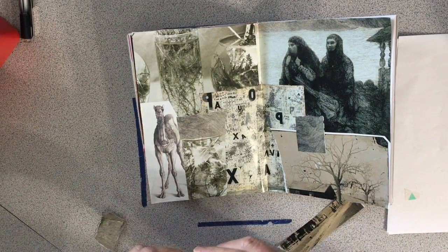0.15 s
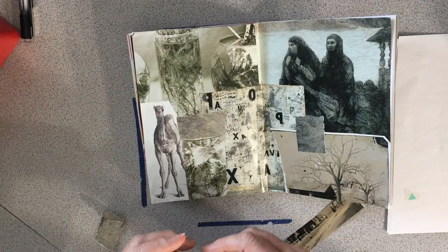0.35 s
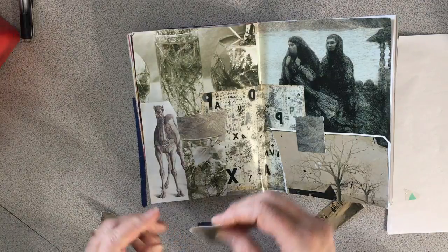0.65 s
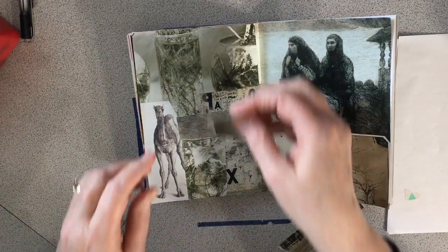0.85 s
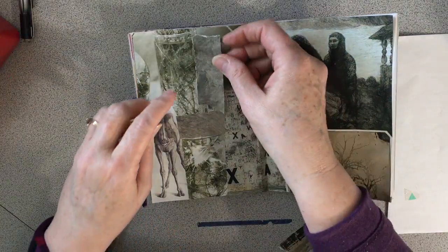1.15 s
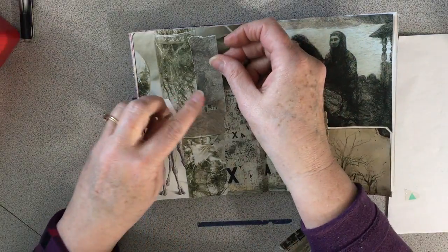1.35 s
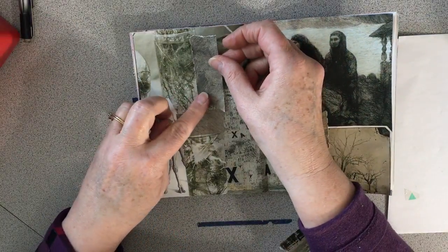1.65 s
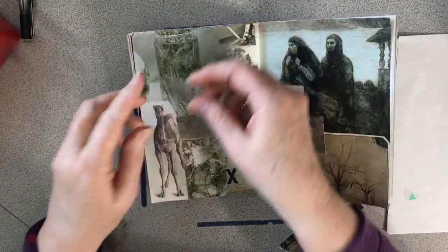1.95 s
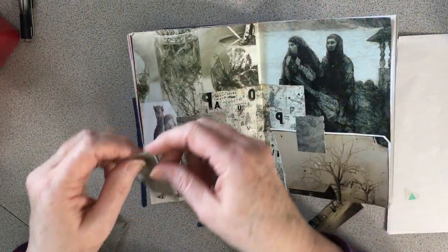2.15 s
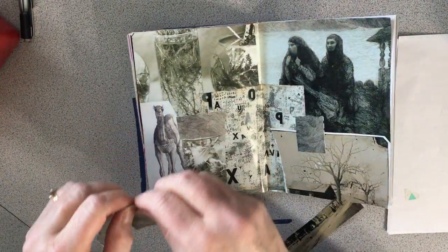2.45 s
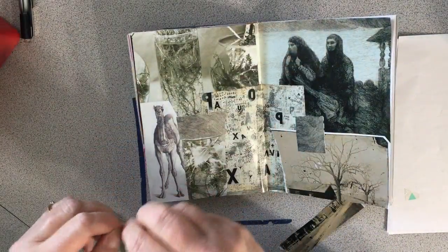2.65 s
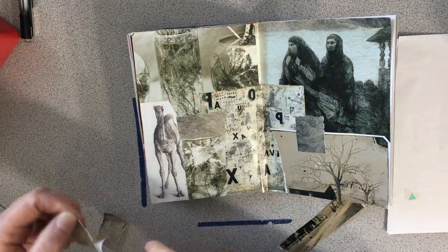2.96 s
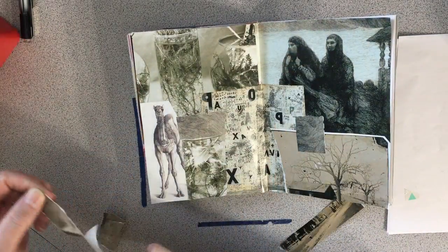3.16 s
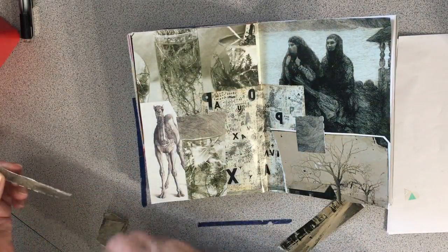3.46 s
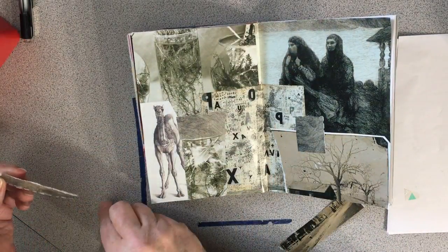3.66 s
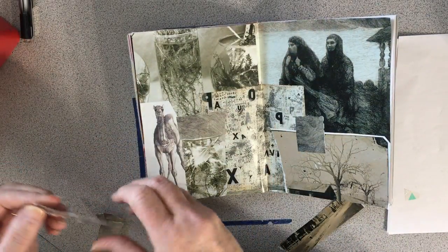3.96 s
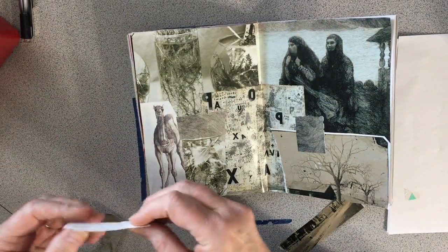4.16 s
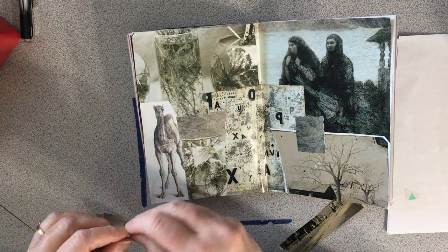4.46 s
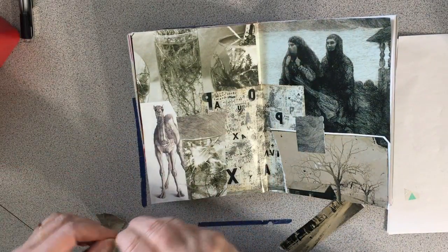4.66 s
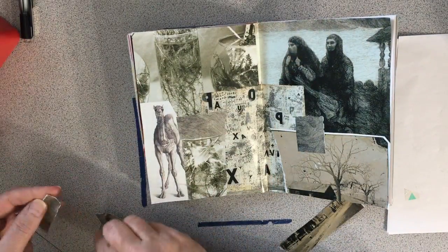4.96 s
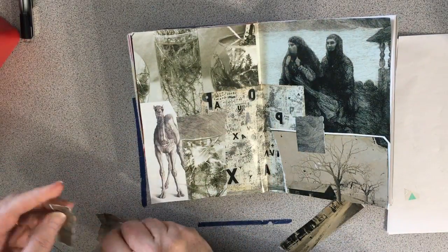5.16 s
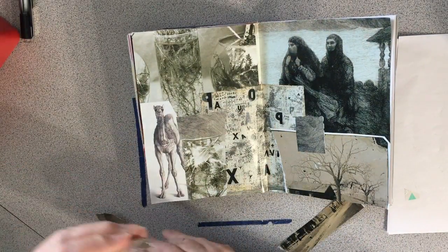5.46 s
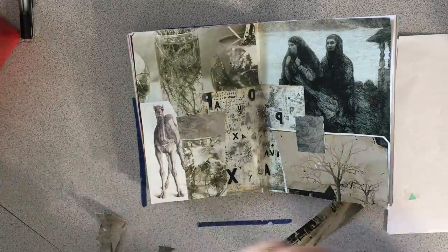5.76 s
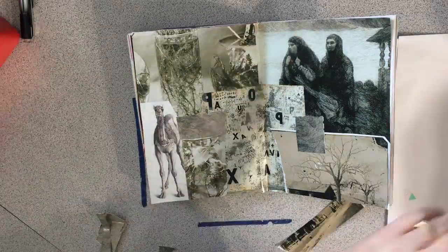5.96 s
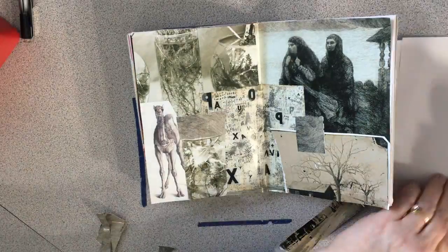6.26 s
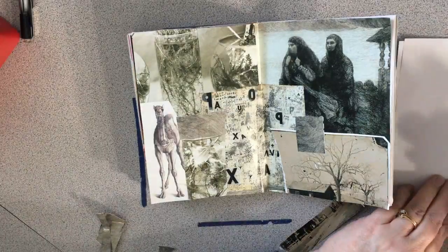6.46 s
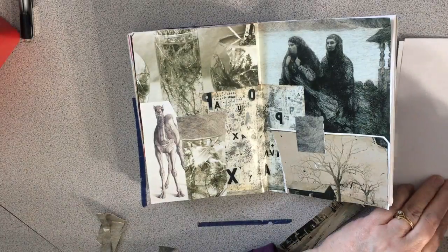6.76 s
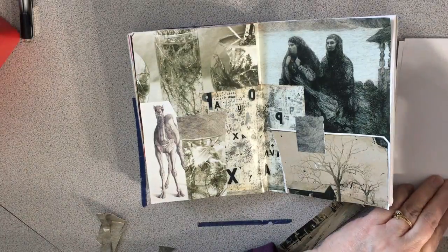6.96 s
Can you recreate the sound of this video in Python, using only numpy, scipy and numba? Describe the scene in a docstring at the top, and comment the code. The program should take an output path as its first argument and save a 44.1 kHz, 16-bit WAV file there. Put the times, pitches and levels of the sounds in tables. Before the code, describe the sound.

Close paper handling at a desk: faint crackles, a sharp dry rip, a very short snip of a tear, then a hand softly thumping the tabletop.

```python
"""Paper collage at a desk in a quiet room, heard close: ventilation rumble and hiss (shaped noise) throughout.
From the start a scrap is picked up and tried on the page: brushes and strokes (noise, grain), ticks (bursts).
Near 2.9 s a long rip, near 4.8 s a very short one: snapping fibres drive a flap whose ring falls as it grows,
while bending paper sings in gliding modes. From 6 s a hand slides a sheet and knocks softly on the desk,
heard as decaying modes of its top; the hardest knock leaves thin metal ringing."""
import sys
import numpy as np
from scipy import signal
from scipy.fft import rfft, irfft, next_fast_len
from scipy.io import wavfile
from scipy.ndimage import uniform_filter1d, map_coordinates
from numba import njit

SR = 44100
rng = np.random.default_rng(int(sys.argv[2]) if len(sys.argv) > 2 else 0)


def master(y):
    """Save y as 16-bit WAV."""
    cut = np.clip(np.atleast_2d(y).T, -1, 1)
    pcm = np.round(cut * 32767)  # scale
    wavfile.write(sys.argv[1], SR, pcm.astype(np.int16))


N = 313110

# Ventilation rumble: pitch_hz, density_db (per Hz)
VENT_SPECTRUM = [(13, -58), (22, -30.5), (36, -1.5), (54, 0.5), (68, -11), (86, -11), (119, -8), (131, -15),
                 (146, -18.5), (221, -18.5), (249, -19), (278, -24.5), (333, -27), (400, -33.5), (520, -44),
                 (880, -120)]
# Narrow bands of the ventilation: pitch_hz, width_hz, level_db
VENT_BANDS = [(58.6, 24, -61.5), (255.8, 9.6, -78.5), (2940, 150, -117)]
# Even hiss of the place: pitch_hz, density_db (per Hz)
AIR_SPECTRUM = [(180, -26), (300, 4), (344, 4.5), (544, 1), (938, -1), (1130, -4), (1980, -4.5), (2830, -7),
                (3660, -6), (12000, -23), (17500, -32)]
# Thin whines in the room: pitch_hz, level_db
WHINES = [(2040, -86), (2796, -84)]
WHINE_WAVER_DB = 0.5

# A hand or sleeve brushes over the desk: middle_s, length_s, level_db, pitch_hz
BRUSHES = [(0.2, 0.56, -75.5, 1610), (0.8, 0.57, -76, 1740), (1.635, 0.38, -73, 1550),
           (2.168, 0.68, -70.5, 1410), (3.967, 0.06, -72.5, 4100), (4.12, 0.13, -77, 1420),
           (5.062, 0.07, -76, 3960), (5.317, 0.069, -73, 4370), (5.774, 0.28, -75, 1390),
           (6.45, 0.4, -77, 3700), (6.597, 0.66, -74, 1880)]
BRUSH_WIDTH = 0.37  # width of the hush over its centre
BRUSH_OVERTONE, BRUSH_OVERTONE_DB = 2.08, -11.5  # upper band: ratio, level before its doubled width

# Fingers and paper stroking paper: middle_s, length_s, level_db (relative), tilt_db (per octave)
STROKES = [(0.136, 0.17, -62, 4.5), (0.367, 0.31, -67, -1.5), (0.432, 0.03, -47, 0),
           (0.828, 0.042, -65.5, -4), (0.96, 0.03, -68, 2), (1.01, 0.33, -70, -6), (1.16, 0.083, -63, -3.5),
           (1.218, 0.1, -62, -3.5), (1.326, 0.29, -72.5, -5), (2.004, 0.44, -64.5, -5),
           (2.339, 0.11, -62.5, -3), (2.455, 0.28, -67.5, -4), (2.843, 0.17, -53.5, 1.5),
           (3.476, 0.06, -74, 5), (3.68, 0.22, -68, 7.5), (3.83, 0.091, -65, 11), (4.22, 0.32, -72.5, -5),
           (4.536, 0.033, -59, 1), (4.575, 0.18, -67.5, 1.5), (4.659, 0.043, -64, -3),
           (4.699, 0.041, -60, 2.5), (4.805, 0.13, -60, 2.5), (5.004, 0.15, -66, 6),
           (5.18, 0.3, -68.5, 1.5), (5.342, 0.15, -67, 3), (5.48, 0.089, -55.5, 7), (5.702, 0.14, -63, 2),
           (5.886, 0.14, -71, -3.5), (6.237, 0.049, -48, 2.5), (6.272, 0.029, -44, 1),
           (6.368, 0.28, -64, -2.5), (6.662, 0.042, -64.5, -2), (6.747, 0.019, -61.5, 4)]
# Rubbed paper grain: pitch_hz, density_db (per Hz)
RUB_SPECTRUM = [(1180, -3), (2000, -2.5), (2630, -5.5), (3780, 0), (7860, 0), (9130, 3.5), (10400, -2.5),
                (16500, -3)]
GRAIN_RATE, CATCH_RATE = 5000, 150  # paper grains and tiny catches a second under a stroke
CATCH_DB = -76
RESTLESS_DB, PRESSURE_DB = 1.5, 1.6  # wavering of the faint rustle and of each stroke's pressure

# The scrap buckles or taps the page; the rows near 4.87 s are the short rip's last snaps: start_s, peak_db,
# body_db, edge_db (all relative), body_hz, snap_hz
TICKS = [(0.0199, -41, -9.5, -9, 1970, 4230), (0.175, -56.5, -13, 9, 1700, 6000),
         (0.2063, -48, -3, -3, 1310, 5430), (0.2147, -41, -8, -12, 1170, 5170),
         (0.3018, -61, 9, -13, 840, 4500), (0.3604, -60, 9, 4, 1160, 5000),
         (0.4328, -31, -18, -4, 1140, 6100), (0.8902, -51.5, -12, -1, 1800, 4200),
         (0.9099, -47.5, -7, 3, 1530, 4040), (0.915, -47.5, -5, -10, 1880, 3620),
         (0.946, -59, -12, 0, 1800, 5000), (1.0324, -56.5, -3.5, 5, 990, 4400),
         (1.131, -53.5, -11, -10, 2200, 3400), (1.2272, -50, -16, -4, 1800, 4400),
         (1.249, -55, -12, 4, 1800, 4600), (1.305, -61, -10, 7.5, 1800, 5000),
         (1.319, -58, -2.5, -8, 930, 4000), (1.352, -62, -2, -7, 700, 5000),
         (1.5673, -47.5, 0, -11, 830, 3170), (1.749, -64, 6, 4, 960, 2800), (1.845, -65, 7, 7, 1050, 2800),
         (1.9806, -31.5, -11.5, -8, 1550, 4270), (1.998, -41.5, -13, -12, 1170, 5000),
         (2.0341, -30, -10.5, 3.5, 1140, 4770), (2.208, -49, -14, 1, 1400, 4300),
         (2.2367, -29, -14, -7, 1000, 4730), (2.7042, -66, 12, -18, 890, 3620),
         (2.773, -42, -18, 4.5, 1180, 4920), (2.7778, -51, -17, 9, 1200, 4230),
         (2.827, -33.5, -33, -12, 1900, 4700), (3.681, -47, -12, -7, 2350, 6500),
         (4.1629, -38.5, -14, -22, 1640, 5540), (4.397, -41, -14, -12, 2160, 4330),
         (4.5102, -53, -6, 2, 890, 4000), (4.532, -48, -9.5, 3.5, 1440, 5440),
         (4.604, -53, -16, 2, 1800, 4740), (4.6916, -56, -25, 5, 1800, 4400),
         (4.753, -60, -23, 6, 1800, 6000), (4.761, -61, -25, 6.5, 1800, 6000),
         (4.7872, -53, -23, 7, 1800, 5500), (4.8641, -34, -16.5, -7, 765, 3000),
         (4.8735, -48, -25, -8, 1900, 4200), (4.881, -49, -23, -11, 1900, 4400),
         (5.2229, -57, -12, 6, 1800, 4400), (6.079, -54, -3.5, 9, 1310, 4440),
         (6.2226, -41, -24, 0, 1800, 5340), (6.319, -55, -16, 8.5, 1200, 5500),
         (6.4147, -54, -6, 4, 1800, 4400), (6.855, -60, -6, 2, 1800, 6200),
         (7.0301, -48, -13, 5.5, 1800, 5400)]
BUCKLE_ATTACK_S = 0.00094
BODY_SPAN, SNAP_SPAN = 1.65, 1.5  # a tick's bands reach this ratio above and below their centres
REBOUND_S, REBOUND_DB = 0.0095, -14.5  # the sheet springs back: typical delay, drop

# The two tears: start_s, length_s, last_flap_hz, first_uncut_hz, last_uncut_hz,
# uncut_db (ring of the uncut part, relative), parting_t60_s (last fibres letting go)
RIPS = [(2.872, 0.4427, 289, 2050, 3850, -27.5, 0.037), (4.819, 0.047, 2500, 11900, 15100, -18, 0.0055)]
# Strength of each pull: time_s, level_db (relative)
LONG_PULL = [(2.83, -60), (2.866, -51), (2.884, -46), (2.915, -33.5), (2.955, -36), (3.02, -39.5),
             (3.045, -39), (3.1, -37.5), (3.13, -35.5), (3.26, -37), (3.31, -38)]
SHORT_PULL = [(4.805, -51.5), (4.82, -48), (4.828, -37), (4.835, -39), (4.84, -38), (4.85, -34.5),
              (4.864, -30.5)]
# Brief surges and dips in the tear's strength: middle_s, level_db (over the pull)
SURGES = [(2.8868, 9), (2.916, -0.5), (2.922, 6), (2.9349, 1.5), (2.9468, 8), (2.9676, 9), (2.9755, 3),
          (2.985, 3), (3.0035, 7), (3.0271, 5), (3.068, 0), (3.0783, 3), (3.086, 5.5), (3.1223, 2.5),
          (3.1558, 0), (3.1813, 3), (3.1878, 3), (3.2046, 1), (3.2222, 4), (3.233, 6.5), (3.2582, 1),
          (3.2863, 1), (3.3079, 1.5), (4.8385, 6), (4.845, 4.5), (4.8605, -4.5)]
SURGE_S = 0.0019  # half the length of each
# Snapping fibres: pitch_hz, density_db (per Hz)
FIBRE_SPECTRUM = [(530, -15), (900, 1.5), (1380, -12.5), (2100, -2), (2660, -2), (3150, -6), (5490, 0),
                  (6440, 0.5), (9500, -1.5), (10600, -4.5), (13000, 1.5), (17000, 2)]
# Resonances of the sheet in the hands: pitch_hz, width_hz, level_db
SHEET_MODES = [(3540, 300, 3.5), (4140, 660, -25), (6940, 1500, -1.5), (8580, 450, 6.5), (9620, 250, 8),
               (11660, 1300, 4)]
# Held part of the scrap: pitch_hz, density_db (per Hz)
HELD_SPECTRUM = [(200, -13), (500, -4), (1000, -4.5), (1500, -7.5), (3000, -6), (8000, -2.5),
                 (17000, -11.5)]
GRIP_S = 0.03  # the fingers take up the strain before each pull
CLUMP_RATE = 300  # how often a second the tear may catch or run
FLAP_FALL, STUB_HZ = 1.106, 11600  # power of the torn share by which the flap's mode falls; its ceiling
FLAP_OVERTONE, FLAP_OVERTONE_DB = 3.56, -1  # second mode: ratio to the first, level over it
UNCUT_RISE = 2.4  # the uncut part stiffens late, as this power of the torn share
UNCUT_FREEING = 0.087  # its ring grows as this power of the torn share
UNCUT_OVERTONE, UNCUT_OVERTONE_DB = 2.32, 8  # second mode: ratio to the first, level over it

# A mode of the bending paper sings: middle_s, length_s, pitch_hz, glide (octaves per s), level_db (relative)
BENDS = [(2.931, 0.066, 3310, -0.5, -38), (2.938, 0.16, 9740, 0.5, -40.5), (2.944, 0.056, 4330, -4, -41),
         (2.975, 0.032, 1910, 10, -41.5), (3, 0.09, 8400, -1, -36), (2.987, 0.053, 12000, .5, -48),
         (3.012, 0.05, 2140, -4, -50), (3.023, .1, 4260, -2, -43), (3.028, .03, 6250, -10, -35),
         (3.071, .12, 805, -3.5, -52), (3.105, .07, 630, -2, -51), (3.069, 0.056, 6900, 4.5, -43),
         (3.103, 0.071, 4200, -2, -44.5), (3.114, .08, 2140, -1.5, -50.5), (3.144, 0.074, 12500, 7, -39),
         (3.178, .13, 6750, .7, -45), (3.207, 0.14, 9100, 0, -45), (3.214, 0.025, 2800, -5, -41.5),
         (3.264, .14, 3380, 2.3, -48.5), (4.835, 0.01, 12400, 2, -46), (4.857, .02, 5050, -1, -40.5),
         (4.865, 0.007, 3160, -12, -37)]
JERK_DB = 2.5  # depth of the jerks that drive it
BEND_DAMPING, BEND_WIDTH_HZ = 0.036, 56  # its width: a share of its pitch plus a constant part

# The hand meets the desk: start_s, level_db, corner_hz (lower is softer), thud_db, thud_hz, thud_t60_s
KNOCKS = [(6.082, -53, 350, -47.5, 207, 0.18), (6.087, -60, 218, -38.5, 104.5, 0.099),
          (6.15, -53, 560, -53, 574, 0.075), (6.2663, -46, 1900, -44, 107, 0.054),
          (6.27, -40.5, 1900, -32, 108, 0.065), (6.2764, -38.5, 1690, -29, 99, 0.063),
          (6.2835, -55, 1300, -27, 78.6, 0.1), (6.684, -68, 100, -36.5, 53.3, 0.13),
          (6.7494, -30, 607, -30.5, 65, 0.22), (6.7648, -46, 420, -37, 94.5, 0.063),
          (6.795, -53, 450, -52, 60, .1), (6.812, -62, 200, -41, 53.7, 0.19),
          (7.081, -66, 100, -31.5, 51.7, 0.13)]
# Modes of the desk top: pitch_hz, level_db (relative), t60_s
DESK_MODES = [(123, -13, 0.093), (176.5, -8.5, 0.16), (209, -1, 0.11), (323, -5.5, 0.13), (440, 5.5, 0.042),
              (484, 3.5, 0.042), (536, -0.5, 0.03), (629, -10, 0.076), (740, -10.5, 0.094),
              (940, -9.5, 0.039), (1084, -7, 0.061), (1270, -14.5, 0.075), (1546, -7, 0.041),
              (1710, -9, 0.03), (2130, -16, 0.04), (2730, -23, 0.017)]
# Thin metal on the desk, ringing after the hardest knock: pitch_hz, level_db (over the knock), t60_s
METAL_MODES = [(438, -35, 1.7), (2040, -48, 4)]

# Decay of the room: pitch_hz, t60_s
ROOM_DECAY = [(150, 0.47), (2000, 0.17), (8000, 0.14), (16000, 0.12)]
SCATTER_RATE = 9  # how often a second the scatter changes
TOP_HZ = 17650


def amp(db):
    """Decibels to gain."""
    return 10 ** (np.asarray(db) / 20)


def unit(x):
    """Scale to rms 1."""
    return x / np.sqrt(np.mean(x ** 2) + 1e-20)


def along(points, hz):
    """(Hz, value) points read on a log axis."""
    f, v = np.transpose(points)
    return np.interp(np.log(hz + 1), np.log(f + 1), v)


def fade(t, t60):
    """Exponential decay by 60 dB in t60 seconds."""
    return np.exp(-np.log(1000) * t / t60)


def add(track, s, sound):
    """Mix a sound into the track at s seconds."""
    part = track[round(s * SR):][:len(sound)]
    part += sound[:len(part)]


def filtered(x, response):
    """x times a response of frequency."""
    m = next_fast_len(N + SR // 2)
    return irfft(rfft(x, m) * response(np.fft.rfftfreq(m, 1 / SR)), m)[:N]


def coloured(x, spectrum):
    """x shaped by a (Hz, dB) spectrum, at rms 1."""
    return unit(filtered(x, lambda hz: amp(along(spectrum, hz))))


def resonance(hz, centre, width):
    """Response of one damped mode."""
    return 1j * hz * width / (centre ** 2 - hz ** 2 + 1j * hz * width)


def snaps(rate, spread_db):
    """Random impulses of either sign, about rate a second, their sizes spread by spread_db."""
    size = amp(spread_db * np.clip(rng.standard_normal(N), -2, 2))
    return unit((rng.random(N) < rate / SR) * size * rng.choice([-1, 1], N))


def wobble(rate):
    """A smooth random curve, rate knots a second."""
    knots = rng.standard_normal(N // 8)
    return map_coordinates(knots, [np.arange(N) * rate / SR], mode="wrap")


@njit
def moving_mode(x, tuning, damping):
    """High-pass and band-pass outputs of a resonator whose tuning changes every sample."""
    high, band = np.zeros(len(x)), np.zeros(len(x))
    a = b = 0.0
    for i in range(len(x)):
        g = tuning[i]
        high[i] = (x[i] - (damping + g) * a - b) / (1 + g * (damping + g))
        band[i] = g * high[i] + a
        a = g * high[i] + band[i]
        b += 2 * g * band[i]
    return high, band


def flexing(x, depth_db, size):
    """A bending sheet favours changing bands: broad and brief for a small size (samples), else narrow and long."""
    z = signal.stft(x, nperseg=size)[2]
    field = uniform_filter1d(rng.standard_normal(z.shape), size=7, axis=1)
    field = uniform_filter1d(field, size=5, axis=0)
    return unit(signal.istft(z * amp(depth_db * unit(field)), nperseg=size)[1][:N])


def background(air_db, vent_db):
    """Ventilation rumble with narrow bands and thin wavering whines, under an even hiss."""
    t = np.arange(N) / SR
    noise = lambda: rng.standard_normal(N)
    out = amp(air_db) * coloured(noise(), AIR_SPECTRUM)
    out += amp(vent_db) * coloured(noise(), VENT_SPECTRUM)
    for centre, width, db in VENT_BANDS:
        out += amp(db) * unit(filtered(noise(), lambda hz: resonance(hz, centre, width) ** 2))
    for hz, db in WHINES:
        tone = np.sin(2 * np.pi * hz * t + wobble(22))
        out += amp(db) * unit(amp(WHINE_WAVER_DB * wobble(4.7)) * tone)
    return out


def brushing():
    """A hand gliding over the desk hisses in one broad hollow band and a weaker one above it."""
    out = np.zeros(N)
    for s, length, db, centre in BRUSHES:
        count = round(length * SR)
        hz = np.fft.rfftfreq(count, 1 / SR)
        width = BRUSH_WIDTH * centre
        lower = resonance(hz, centre, width) ** 2
        upper = resonance(hz, BRUSH_OVERTONE * centre, 2 * width) ** 2
        bands = lower + amp(BRUSH_OVERTONE_DB) * upper
        hush = unit(irfft(rfft(rng.standard_normal(count)) * bands, count))
        add(out, max(0, s - length / 2), amp(db) * hush * signal.windows.tukey(count, 0.5))
    return out


def rubbing(rustle_db, slide_db, flutter_db):
    """Paper grain catches under the fingertips in strokes of their own brightness, over a faint restless rustle."""
    rustle = coloured(snaps(3000, spread_db=3.5), RUB_SPECTRUM)
    out = amp(rustle_db + RESTLESS_DB * wobble(4.6)) * rustle
    grain = flexing(coloured(snaps(GRAIN_RATE, spread_db=2.5), RUB_SPECTRUM), depth_db=2.0, size=256)
    grain *= amp(flutter_db * wobble(120) + PRESSURE_DB * wobble(22))
    touch = np.zeros(N)
    for s, length, db, tilt in STROKES:
        start = max(0, s - length / 2)
        stroke = grain[round(start * SR):][:round(length * SR)]
        hz = np.fft.rfftfreq(len(stroke), 1 / SR)
        brightness = amp(tilt * np.log2(1 + hz / 1000))
        stroke = unit(irfft(rfft(stroke) * brightness, len(stroke)))
        pressure = signal.windows.tukey(len(stroke), 0.85)
        add(out, start, amp(db + slide_db) * stroke * pressure)
        add(touch, start, pressure)
    catches = coloured(snaps(CATCH_RATE, spread_db=6), RUB_SPECTRUM)
    return out + amp(CATCH_DB) * touch * catches


def ticks(snap_t60, body_t60, body_db, middle_db, edge_db):
    """Each tick, a buckle or a last snap of the tear, is a crack whose body outlasts its treble; a weak rebound
    follows."""
    out, t = np.zeros(N), np.arange(SR // 20) / SR

    def crack(lo_hz, hi_hz, t60):
        """A band of noise with a soft onset and two decays, one shared by all bands."""
        sos = signal.butter(2, [lo_hz, hi_hz], "band", fs=SR, output="sos")
        attack = 1 - np.exp(-(t / BUCKLE_ATTACK_S) ** 2)
        envelope = (fade(t, t60) + 0.91 * fade(t, 0.013)) * attack
        return unit(signal.sosfilt(sos, rng.standard_normal(len(t)) * envelope))

    for s, db, body, edge, body_hz, snap_hz in TICKS:
        rebound_s = REBOUND_S * np.exp(0.18 * rng.standard_normal())
        for delay, drop_db in [(0, 0), (rebound_s, REBOUND_DB)]:
            low = amp(body + body_db) * crack(body_hz / BODY_SPAN, body_hz * BODY_SPAN, body_t60)
            middle = amp(middle_db) * crack(snap_hz / SNAP_SPAN, snap_hz * SNAP_SPAN, snap_t60 * 1.5)
            high = amp(edge + edge_db) * crack(8700, 13400, snap_t60)
            add(out, s + delay, amp(db + drop_db) * (low + middle + high))
    return out


def rip(row, pull, rate, spread_db, clump_db, damping, ring_db, ring_damping, leak, tilt_db):
    """Fibres snap at a tear that catches and runs; the freed flap radiates above its mode, the uncut part rings."""
    start, length, last_flap_hz, first_uncut_hz, last_uncut_hz, uncut_db, parting_t60 = row
    t = np.arange(N) / SR
    level_db = np.interp(t, *np.transpose(pull))
    level_db += sum(db * np.exp(-((t - s) / SURGE_S) ** 2) for s, db in SURGES)
    torn = np.clip((t - start) / length, 1 / SR, 1)  # share of the tear
    flap_hz = np.minimum(last_flap_hz / torn ** FLAP_FALL, STUB_HZ)
    uncut_hz = first_uncut_hz * (last_uncut_hz / first_uncut_hz) ** (torn ** UNCUT_RISE)

    clumps = unit(amp(clump_db * wobble(CLUMP_RATE)))
    pulls = lambda: snaps(rate, spread_db) * clumps
    tuning = lambda hz: np.tan(np.pi * np.minimum(hz, SR / 3) / SR)
    ring = lambda hz: moving_mode(pulls(), tuning(hz), ring_damping)[1]

    def sheet(hz):
        """Modes of the held paper, with a treble tilt."""
        modes = sum(amp(db) * resonance(hz, centre, width) for centre, width, db in SHEET_MODES)
        return (1 + modes) * amp(tilt_db * np.log2(1 + hz / 1000))

    fibres = flexing(coloured(filtered(pulls(), sheet), FIBRE_SPECTRUM), depth_db=3, size=64)
    radiated = moving_mode(fibres, tuning(flap_hz), damping)[0]
    flap = ring(flap_hz) + amp(FLAP_OVERTONE_DB) * ring(FLAP_OVERTONE * flap_hz)
    uncut = ring(uncut_hz) + amp(UNCUT_OVERTONE_DB) * ring(UNCUT_OVERTONE * uncut_hz)
    uncut *= amp(uncut_db) * torn ** UNCUT_FREEING
    # a little also leaves through the held part of the scrap
    held = leak * coloured(pulls(), HELD_SPECTRUM)

    grip = np.clip(1 + (t - pull[0][0]) / GRIP_S, 0, 1) ** 2
    parting = fade(np.maximum(t - start - length, 0), parting_t60)
    return grip * parting * amp(level_db) * (radiated + amp(ring_db) * flap + uncut + held)


def bends():
    """The flexing paper lets one gliding mode after another sing out, driven by jerky noise."""
    out, t = np.zeros(N), np.arange(N) / SR
    jerks = amp(JERK_DB * wobble(CLUMP_RATE))
    for s, length, hz, glide, db in BENDS:
        count = round(length * SR)
        pitch_hz = hz * 2 ** (glide * (t[:count] - length / 2))
        drive = rng.standard_normal(count) * jerks[round(s * SR):][:count]
        damping = BEND_DAMPING + BEND_WIDTH_HZ / hz
        ring = moving_mode(drive, np.tan(np.pi * pitch_hz / SR), damping)[1]
        add(out, s - length / 2, amp(db) * unit(ring) * signal.windows.tukey(count, 0.6))
    return out


def knocks(slap, slap_t60):
    """A soft hand excites mostly low modes of the desk top and heaves the desk; the hardest blow rings thin metal."""
    out, t = np.zeros(N), np.arange(SR) / SR
    ringing = lambda hz, t60: fade(t, t60) * np.sin(2 * np.pi * hz * t)
    for s, db, corner_hz, thud_db, thud_hz, thud_t60 in KNOCKS:
        top = np.zeros(SR)
        for k, (hz, level, t60) in enumerate(DESK_MODES):
            softness = 1 / np.hypot(1, (hz / corner_hz) ** 2)
            # each blow excites the modes a little differently, in alternating sign
            top += (-1) ** k * amp(level + rng.normal(0, 1)) * softness * ringing(hz, t60)
        skin_filter = signal.butter(3, corner_hz * 0.74, fs=SR, output="sos")
        skin = unit(signal.sosfilt(skin_filter, rng.standard_normal(SR)))
        blow = (top + slap * skin * fade(t, slap_t60)) * (1 - np.exp(-t / 0.00038))
        thud = ringing(thud_hz, thud_t60) * (1 - np.exp(-t / 0.0023))
        add(out, s, amp(db) * blow + amp(thud_db) * thud)
    s, db = max(KNOCKS, key=lambda row: row[1])[:2]
    add(out, s, sum(amp(db + level) * ringing(hz, t60) for hz, level, t60 in METAL_MODES))
    return out


def room(x, near_db, near_t60, far_db):
    """Slowly varying early scatter from the desk and things on it, then the room's short tail."""
    hz, t, z = signal.stft(rng.standard_normal(SR // 2), SR, nperseg=256)
    decay = fade(t, along(ROOM_DECAY, hz)[:, None])
    tail = signal.istft(z * decay, SR, nperseg=256)[1][:SR // 2]
    t = np.arange(len(tail)) / SR
    echo = lambda response: signal.oaconvolve(x, response / np.linalg.norm(response))[:N]
    near = lambda: echo(rng.standard_normal(len(t)) * fade(t, near_t60) * (t > 0.001))
    turn = np.pi * wobble(SCATTER_RATE)
    scatter = np.cos(turn) * near() + np.sin(turn) * near()
    return x + amp(near_db) * scatter + amp(far_db) * echo(tail * (t > 0.005))


def scene():
    """Close paper sounds and the desk, each with its own share of the room, over the background."""
    paper = brushing() + rubbing(rustle_db=-76.0, slide_db=-1.0, flutter_db=2)
    paper += ticks(snap_t60=0.0072, body_t60=0.035, body_db=-15, middle_db=-22.5, edge_db=-23)
    long_rip = rip(RIPS[0], LONG_PULL, rate=7000, spread_db=0, clump_db=0.5, damping=0.69,
                   ring_db=-24.5, ring_damping=0.08, leak=0.28, tilt_db=1.0)
    short_rip = rip(RIPS[1], SHORT_PULL, rate=16000, spread_db=5.0, clump_db=2.5, damping=0.88,
                    ring_db=-35, ring_damping=0.31, leak=0.13, tilt_db=-2.0)
    paper += amp(-1.5) * (long_rip + short_rip) + amp(-4.5) * bends()
    desk = knocks(slap=0.83, slap_t60=0.07)
    paper = room(paper, near_db=-9.5, near_t60=0.033, far_db=-13.0)
    desk = room(desk, near_db=-18, near_t60=0.04, far_db=-20)
    return (paper + desk + background(air_db=-73, vent_db=-60))[None]


def record(dry):
    """The recorder behind the microphone cuts the deepest rumble and keeps nothing above its band limit."""
    low_cut = signal.butter(4, 34, "high", fs=SR, output="sos")
    return filtered(signal.sosfilt(low_cut, dry[0]), lambda hz: hz < TOP_HZ)[None]


dry = scene()
out = record(dry)
master(out)
```